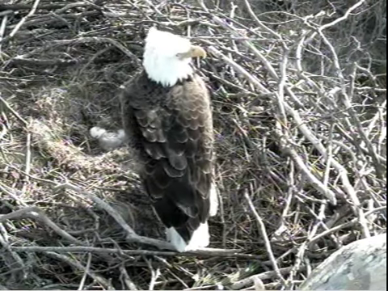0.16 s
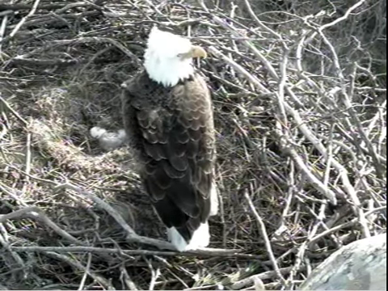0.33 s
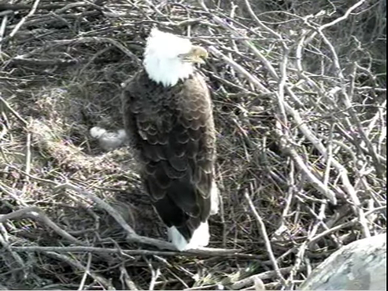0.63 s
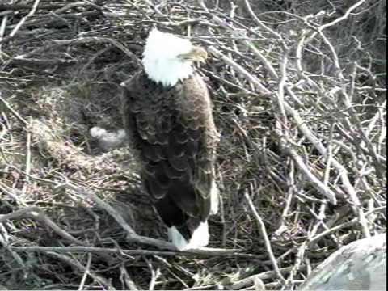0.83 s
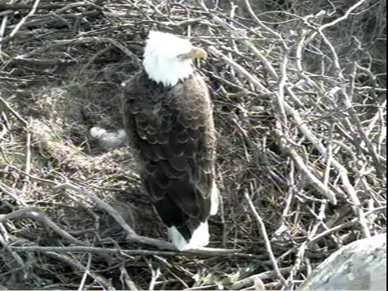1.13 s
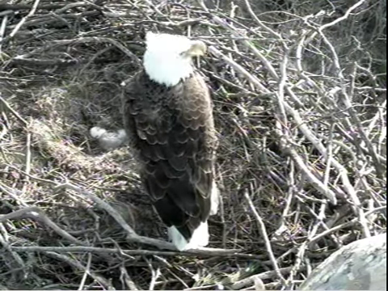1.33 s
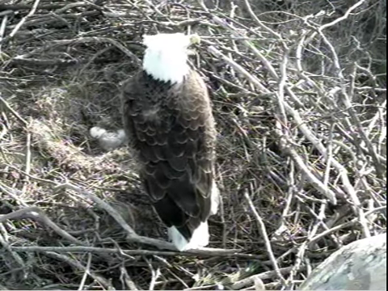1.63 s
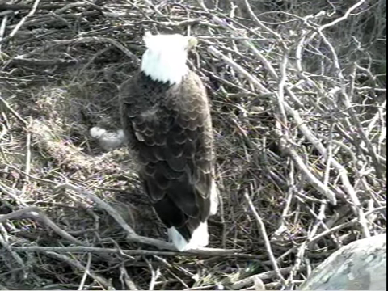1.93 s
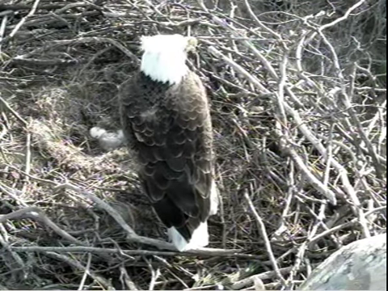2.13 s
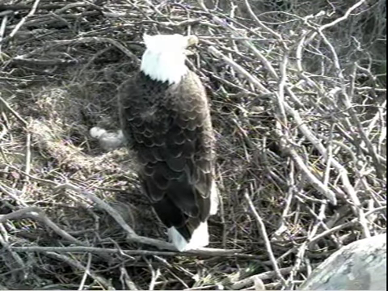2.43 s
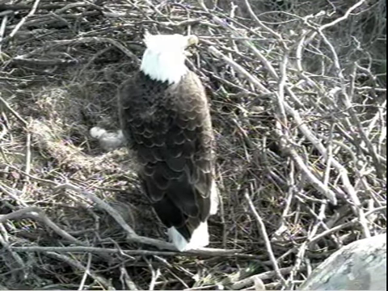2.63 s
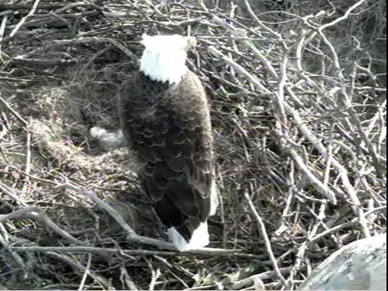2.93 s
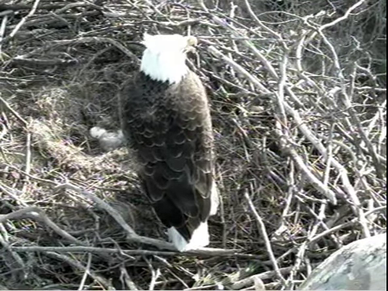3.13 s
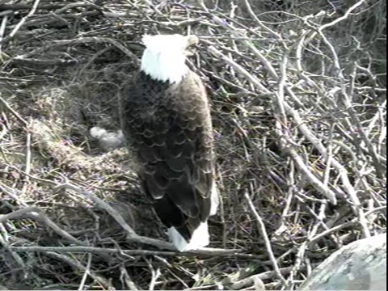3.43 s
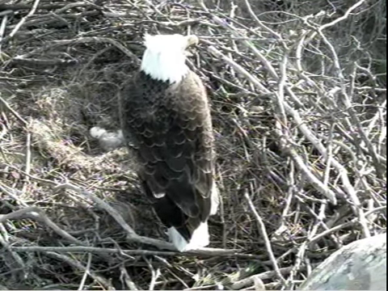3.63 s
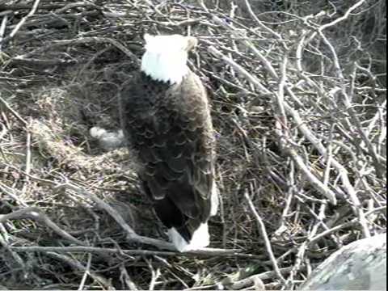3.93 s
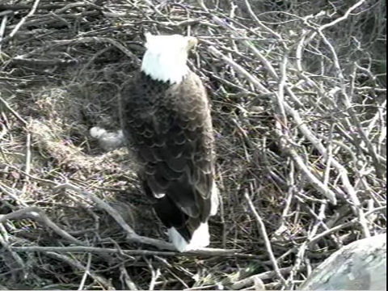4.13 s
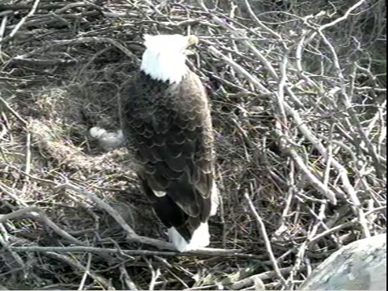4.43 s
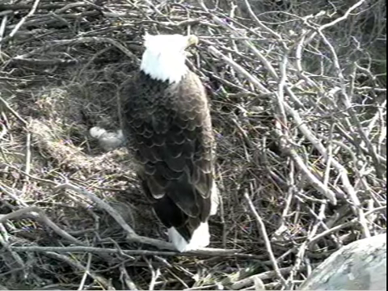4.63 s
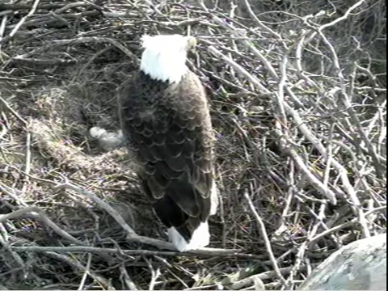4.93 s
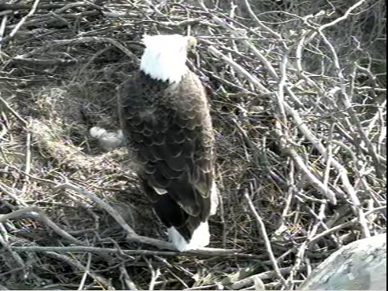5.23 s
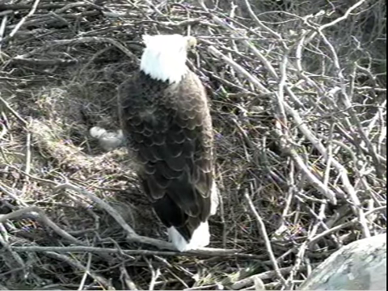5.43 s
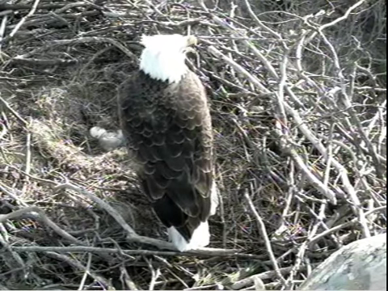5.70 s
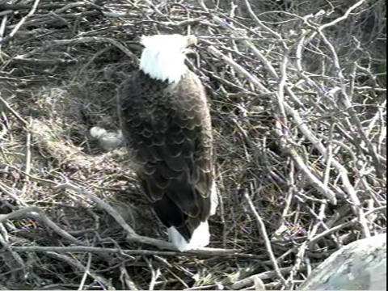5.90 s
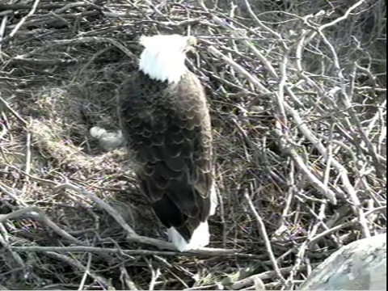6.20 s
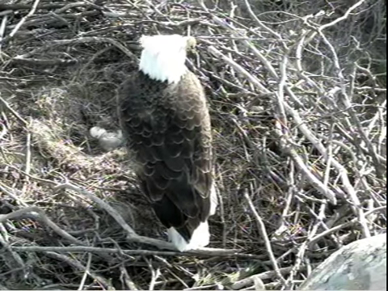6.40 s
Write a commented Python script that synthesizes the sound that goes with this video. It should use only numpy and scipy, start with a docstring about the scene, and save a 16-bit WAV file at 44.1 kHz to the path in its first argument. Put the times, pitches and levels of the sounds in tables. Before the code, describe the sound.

A large bird of prey gives six high whistled calls outdoors over a steady low motor hum, with wind buffeting the microphone at first.

```python
"""At the nest of a bird of prey, one microphone, a small motor droning close by, wind buffeting at first.
The bird whistles six calls with both sides of its voice box, which mix into sum and difference tones;
trunk, ground and branches send a little back. The sound travels on a slow stream that folds high
partials back and drops out once. The player resamples it by repeating its clock's last sample,
which mirrors each whistle."""
import sys
import numpy as np
from scipy import signal
from scipy.fft import rfft, irfft
from scipy.io import wavfile
from scipy.ndimage import uniform_filter1d, minimum_filter1d, map_coordinates

SR = 44100
rng = np.random.default_rng(int(sys.argv[2]) if len(sys.argv) > 2 else 0)


def master(y):
    """Save y as 16-bit WAV."""
    cut = np.clip(np.atleast_2d(y).T, -1, 1)
    pcm = np.round(cut * 32767)  # scale
    wavfile.write(sys.argv[1], SR, pcm.astype(np.int16))


N = 289296
T = np.arange(N) / SR


def amp(db):
    """dB to gain."""
    return 10 ** (np.asarray(db) / 20)


def drift(rate_hz):
    """Random wander of spread 1: noise twice through a one-pole low-pass, run in for a second."""
    pole = np.exp(-2 * np.pi * rate_hz / SR)
    slow = signal.lfilter([1], [1, -2 * pole, pole * pole], rng.standard_normal(N + SR))[SR:]
    return slow / slow.std()


def coloured(spectrum):
    """Noise of rms 1, shaped by rows of f/Hz, relative level/dB."""
    hz, db = np.transpose(spectrum)
    grid = np.fft.rfftfreq(N, 1 / SR) + 1
    shape = amp(np.interp(np.log(grid), np.log(hz), db))
    noise = irfft(rfft(rng.standard_normal(N)) * shape, N)
    return noise / noise.std()


# Shaft speed: t/s, f/Hz
SHAFT_SPEED = [(0, 29.86), (2.3, 29.89), (3.3, 30.13), (4.1, 30.28), (4.95, 30.54), (5.4, 30.62),
               (5.8, 30.56), (6.56, 30.4)]
# Lines of the drone: multiple of shaft speed, level/dB, waver/dB
MOTOR_ORDERS = [(1.034, -56.5, 1.2), (1.973, -57.5, 0.99), (3.057, -65, 2), (3.963, -66.5, 1.5),
                (5.02, -72, 1.5), (6.04, -70, 1.1), (7.84, -55.5, .8), (10.04, -69.5, 0.77),
                (14.04, -72.5, 0.85), (25.03, -62.5, 0.44), (31.47, -73.5, 1.3), (50.3, -75, 1.6),
                (65, -82.5, 1.5), (74.5, -75, 0.88), (92.5, -83.5, 1.4), (99.8, -78.5, 1.8)]
def motor():
    """A small motor near the microphone hums at orders of its shaft speed, each wavering in level."""
    angle = 2 * np.pi * np.cumsum(np.interp(T, *np.transpose(SHAFT_SPEED))) / SR
    starts = rng.uniform(0, 2 * np.pi, len(MOTOR_ORDERS))
    return sum(np.sqrt(2) * amp(db + waver_db * drift(4.1)) * np.sin(order * angle + start)
               for (order, db, waver_db), start in zip(MOTOR_ORDERS, starts))


# Wind strength, as the level of its thudding: t/s, level/dB
GUSTS = [(0, -36), (.02, -41.5), (.12, -42), (.21, -49), (.31, -44.5), (.35, -49.5), (.5, -53), (.57, -60),
         (.63, -47.5), (1.14, -48.5), (1.54, -53.5), (1.9, -59), (2.4, -62), (3.4, -65), (4.3, -58.5),
         (5.2, -70), (6.1, -55.5), (6.56, -64)]
# Spectra of the thudding and the rush: f/Hz, relative level/dB
THUD_SPECTRUM = [(12, -12.5), (40, 4.5), (110, 3), (170, -2.5), (260, -7.5), (500, -34.5)]
RUSH_SPECTRUM = [(60, -20.5), (200, 1.5), (400, -3), (700, -8.5), (1400, -20), (3000, -55)]
def wind(thud_lumps_db=1.5, rush_db=-5, rush_lumps_db=3.0):
    """Wind on the microphone: low thuds and a brighter rush, both in lumps."""
    strength_db = np.interp(T, *np.transpose(GUSTS))
    thuds = amp(strength_db + thud_lumps_db * drift(14)) * coloured(THUD_SPECTRUM)
    rush = amp(strength_db + rush_db + rush_lumps_db * drift(7.2)) * coloured(RUSH_SPECTRUM)
    return thuds + rush


# Background spectrum: f/Hz, relative level/dB
AIR_SPECTRUM = [(12, -4.5), (25, 1), (70, -6.5), (200, -13), (450, -19), (900, -24), (1500, -29.5),
                (2400, -33), (3600, -37.5), (4500, -46)]
def noise_floor(level_db=-51.5):
    """Steady air around the nest and circuit noise."""
    return amp(level_db) * coloured(AIR_SPECTRUM)


# Hiss spectrum: f/Hz, relative level/dB
HISS_SPECTRUM = [(20, 7.5), (3500, 9), (4200, 2), (7500, 7), (9000, 1), (10500, -20)]
def player_hiss(level_db=-82.5):
    """Faint hiss of the player at the far end of the stream."""
    return amp(level_db) * coloured(HISS_SPECTRUM)


# Single eddies: t/s, peak level/dB, length/s
EDDIES = [(0.022, -29.5, 0.0094), (0.071, -35, 0.0096), (0.102, -31.5, 0.0083), (0.39, -30, 0.018),
          (0.789, -45, 0.016), (1.002, -39, 0.023), (1.535, -37.5, 0.035)]
def eddy_thumps():
    """Each eddy gives the microphone's diaphragm one push with a dip on either side."""
    pressure = np.zeros(N)
    for s, db, length_s in EDDIES:
        spread = (np.pi * (T - s) / length_s) ** 2
        pressure += amp(db) * (1 - 2 * spread) * np.exp(-spread)
    return pressure


def membrane(notes, octave_fade_db_per_s, edge_s=.005, join_s=.008, shimmer_db=.8, rasp_db=-31.5):
    """One side of the voice box, a near sine with a rasp of turbulent air: sound, phase, envelope."""
    notes = sorted(notes, key=lambda note: note[1][0][0])
    gate, octave = np.zeros(N), np.zeros(N)
    for octave_db, rows in notes:
        start, end = rows[0][0], rows[-1][0]
        on = np.clip(np.minimum(T - start, end - T) / edge_s + .5, 0, 1)
        gate += on
        age = T[on > 0] - start
        flare_db = 4.5 * np.exp(-age / .026)   # the octave flares as a note starts
        octave[on > 0] = amp(octave_db - octave_fade_db_per_s * age + flare_db)
    # notes closer than join_s run into each other
    join = round(join_s * SR)
    gate = minimum_filter1d(-minimum_filter1d(-gate, size=join), size=join)
    s, hz, db = np.transpose([row for _, rows in notes for row in rows])
    pitch = np.interp(T, s, hz)
    phase = 2 * np.pi * np.cumsum(pitch) / SR
    envelope = np.sqrt(2) * np.minimum(gate, 1) * amp(np.interp(T, s, db) + shimmer_db * drift(52))
    tone = np.sin(phase) + octave * np.sin(2 * phase)
    # the tone sounds rougher the faster its pitch slides
    slide_khz_per_s = np.abs(uniform_filter1d(np.gradient(pitch), SR // 80)) * SR / 1000
    roughness = amp(rasp_db + 1.0839 * np.minimum(slide_khz_per_s, 20)) * drift(600)
    return envelope * (tone + roughness * np.cos(phase)), phase, envelope


# Long whistles, one entry a note: relative octave level/dB, rows of (t/s, f/Hz, level/dB)
LONG_WHISTLES = [ (-8, [(0.716, 1510, -61), (0.724, 1532, -45.5), (0.736, 1600, -47.5), (0.842, 1700, -42),
                 (0.86, 1730, -45.5), (0.874, 1764, -50), (0.882, 1780, -72)]), (-32, [(0.893, 3030, -64),
                 (0.903, 3032, -51.5), (0.945, 3058, -47), (1.005, 3102, -47.5), (1.119, 3145, -36.5),
                 (1.261, 3172, -40), (1.283, 3102, -41), (1.288, 3103, -56)]), (-15, [(1.722, 1750, -48),
                 (1.732, 1786, -38), (1.742, 1897, -36), (1.77, 1971, -35.5), (1.842, 2023, -36.5),
                 (1.928, 2090, -32), (1.944, 2122, -35), (2.04, 2152, -40), (2.114, 2157, -35),
                 (2.238, 2207, -33.5)]), (-29, [(2.697, 2090, -41), (2.705, 2030, -38.5),
                 (2.783, 2091, -38), (2.791, 2103, -35), (2.909, 2159, -37.5), (3.049, 2204, -34.5),
                 (3.071, 2237, -39), (3.091, 2231, -34), (3.147, 2254, -36), (3.16, 2206, -29.5)]),
                 (-31.5, [(3.595, 1812, -53), (3.603, 1850, -37), (3.625, 1980, -36), (3.661, 2025, -36),
                 (3.671, 2085, -44), (3.729, 2104, -37), (3.897, 2227, -37), (3.955, 2207, -35),
                 (4.035, 2252, -36.5), (4.043, 2305, -46), (4.061, 2290, -43), (4.078, 2316, -73)]),
                 (-32, [(4.687, 1889, -52), (4.695, 1884, -35.5), (4.713, 2014, -38.5),
                 (4.723, 2020, -32.5), (4.737, 2080, -42), (4.779, 2136, -38.5), (5.037, 2245, -34.5),
                 (5.085, 2344, -43), (5.108, 2351, -60)]), (-30, [(5.929, 1723, -59), (5.937, 1732, -42.5),
                 (5.963, 1846, -38.5), (5.973, 1894, -43), (6.017, 1990, -40.5), (6.073, 2038, -38.5),
                 (6.177, 2099, -43.5), (6.241, 2118, -39), (6.52, 2190, -38)]), ]
def main_side():
    """The main membrane carries the calls; its octave weakens quickly as a note settles."""
    return membrane(LONG_WHISTLES + list(falls()), octave_fade_db_per_s=15.5)


# Reflections from trunk and ground: delay/s, relative level/dB
REFLECTIONS = [(.023, -23), (.041, -27.5)]
def tree_echoes(call, band_hz=(2040, 3500), scatter_db=-15, scatter_t60_s=.2):
    """Two reflections and the branches' dying scatter, in the band the surroundings return best."""
    t = T[:SR // 2]
    response = rng.standard_normal(len(t)) * amp(-60 * t / scatter_t60_s) * (t > .008)
    response *= amp(scatter_db) / np.sqrt(np.sum(response ** 2))
    for delay_s, db in REFLECTIONS:
        response[round(delay_s * SR)] += amp(db)
    band = signal.butter(2, band_hz, "band", fs=SR, output="sos")
    return signal.fftconvolve(signal.sosfilt(band, call), response)[:N]


# Held notes, one entry a note: relative octave level/dB, rows of (t/s, f/Hz, level/dB)
HELD_NOTES = [ (-30, [(1.06, 2540, -67), (1.13, 2623, -54.5), (1.17, 2699, -42), (1.22, 2745, -43.5),
              (1.274, 2756, -39), (1.284, 2762, -43), (1.292, 2565, -33), (1.31, 2554, -57)]),
              (-31, [(3.7, 1456, -62), (3.732, 1492, -38), (3.782, 1498, -44), (3.828, 1518, -39.5),
              (3.842, 1525, -45), (3.865, 1513, -70)]), (-27, [(3.918, 1548, -53), (3.928, 1546, -39.5),
              (3.958, 1545, -41), (3.98, 1569, -64)]), (-28, [(4.804, 1490, -59), (4.82, 1504, -40.5),
              (4.854, 1512, -46), (4.934, 1525, -42.5), (4.974, 1527, -50), (5.002, 1531, -44.5),
              (5.055, 1533, -62)]), (-29, [(6.0, 1329, -62), (6.042, 1417, -42.5), (6.076, 1426, -39),
              (6.218, 1472, -39), (6.312, 1473, -41.5), (6.358, 1491, -37.5), (6.442, 1517, -35),
              (6.468, 1510, -44.5), (6.485, 1527, -56)]), ]
def second_side():
    """The second membrane adds held notes, catches and high notes at its own pitch."""
    return membrane(HELD_NOTES + list(catches()) + list(high_notes()), octave_fade_db_per_s=3.0)


# How strongly the two sides pull on each other: t/s, gain/dB
SIDE_COUPLING = [(1.15, 7), (1.27, 5), (1.3, 11.5), (2.8, 2), (3.75, 0.1), (3.95, -3), (4.83, 2.5),
                 (4.93, -5), (5.03, 2), (6.05, 3), (6.2, 8.5), (6.42, 2.5), (6.5, 9)]
# Mixing tones: multiple of main, multiple of second, level/dB with both at -40 dB and coupling at 0 dB
MIXING_TONES = [(2, -1, -62), (1, 1, -68.5), (2, -2, -70.5), (-1, 2, -90)]
def voice_box():
    """Both sides sing and, where they overlap, mix into sum and difference tones."""
    main, main_phase, main_envelope = main_side()
    second, second_phase, second_envelope = second_side()
    overlap = main_envelope * second_envelope / (2 * amp(-80))
    coupling = amp(np.interp(T, *np.transpose(SIDE_COUPLING)))
    mixed = sum(np.sqrt(2) * amp(db) * np.sin(m * main_phase + n * second_phase)
                for m, n, db in MIXING_TONES)
    return main + second + overlap * coupling * mixed


# Call endings: t/s, length/s, from f/Hz, to f/Hz, early level/dB, late level/dB, relative octave level/dB
CLOSING_FALLS = [(1.292, 0.024, 2029, 1689, -45, -33.5, -17), (2.24, 0.03275, 2188, 1755, -33.5, -39, -17),
                 (3.165, .039, 2226, 1720, -31, -39, -30), (4.195, .027, 2150, 1818, -38.5, -36.5, -30),
                 (5.188, .028, 2140, 1804, -38.5, -39, -31), (6.522, 0.053, 2213, 1800, -38, -39.5, -30)]
def falls(hold_share=.64, fade_db=12.5, bend=1.3):
    """The main side ends each call with a quickening downward slide that fades over its last part."""
    shares = [0, hold_share / 2, hold_share, 1]
    for s, length, from_hz, to_hz, early_db, late_db, octave_db in CLOSING_FALLS:
        levels = [early_db, (early_db + late_db) / 2, late_db, late_db - fade_db]
        yield octave_db, [(s + k * length, from_hz + k ** bend * (to_hz - from_hz), db)
                          for k, db in zip(shares, levels)]


# Catches in the voice: t/s, length/s, from f/Hz, to f/Hz, peak level/dB
SHORT_CATCHES = [(1.71, 0.029, 1218, 1303, -40), (2.661, 0.037, 1288, 1500, -30),
                 (2.703, 0.012, 1483, 1500, -44), (2.867, 0.036, 1515, 1511, -45),
                 (2.93, 0.036, 1474, 1510, -46.5), (3.001, 0.0298, 1555, 1510, -53.5),
                 (3.584, .023, 1329, 1314, -43.5), (3.613, 0.016, 1430, 1388, -40.5),
                 (3.636, .024, 1453, 1452, -43.5), (3.989, .045, 1547, 1557, -53),
                 (4.673, 0.026, 1368, 1360, -56), (4.705, 0.016, 1450, 1439, -36.5),
                 (6.496, 0.031, 1555, 1592, -48.5), (6.534, .022, 1510, 1450, -50.5)]
def catches(octave_db=-22):
    """The second side sounds for an instant: rise, sagging hold, release."""
    shape = [(0, 20.5), (.3, 0), (.77, 5), (1, 20.5)]   # share of length, drop below peak/dB
    for s, length, from_hz, to_hz, db in SHORT_CATCHES:
        yield octave_db, [(s + k * length, from_hz + k * (to_hz - from_hz), db - drop)
                          for k, drop in shape]


def dropout(off_s=2.018, remnant_end_s=2.05, back_s=2.0675, switch_s=.0005):
    """Gain of the stream: it breaks off, a remnant fades to near silence, it snaps back a bit louder."""
    corners = [(off_s - switch_s, -.5), (off_s + switch_s, -13.5), (remnant_end_s, -27.5),
               (remnant_end_s + .005, -52), (back_s - switch_s, -52), (back_s, 0)]   # t/s, gain/dB
    return amp(np.interp(T, *np.transpose(corners)))


# High notes: t/s, length/s, f/Hz, level/dB, break f/Hz, break level/dB
HIGH_NOTES = [(4.039, .166, 3310, -44, 2700, -39), (5.068, .131, 3333, -44, 2750, -37.5)]
def high_notes(scoop_s=.01764, scoop_hz=119.3, octave_db=-20):
    """The second side jumps to a high note that scoops up, holds and breaks downwards."""
    for s, length, hz, db, break_hz, break_db in HIGH_NOTES:
        end = s + length
        scoop = [(s, hz - scoop_hz, db - 4), (s + scoop_s, hz - scoop_hz / 4, db)]
        hold = [(s + 3 * scoop_s, hz, db), (end - .0341, hz, db)]
        sag_and_break = [(end - .024, hz - 75.3, db + .5), (end - .012, break_hz, break_db)]
        rebound = [(end, break_hz + 100.4, break_db - 9.5)]
        yield octave_db, scoop + hold + sag_and_break + rebound


def steep_low_pass(x, hz):
    """Brick-wall low-pass."""
    return signal.sosfilt(signal.ellip(14, .1, 80, hz, fs=SR, output="sos"), x)


def slow_stream(x, rate_hz=8000, edge_hz=3704):
    """Slow sampling folds what the input filter leaves above half the rate back below it."""
    filtered = signal.sosfilt(signal.butter(12, edge_hz, fs=SR, output="sos"), x)
    mirrored = 2 * filtered * np.cos(2 * np.pi * rate_hz * T)
    return steep_low_pass(filtered + mirrored, rate_hz / 2)


def player_resampling(x, clock_hz=48000):
    """Each sample repeats the player clock's last one: a sawtooth timing error mirrors the whistles."""
    held_s = np.floor(T * clock_hz) / clock_hz
    return map_coordinates(x, [held_s * SR], order=3, mode="nearest")


def scene():
    """Bird, echoes, nearby motor, wind and air at the one microphone by the nest."""
    bird = voice_box()
    return (bird + tree_echoes(bird) + motor() + wind() + eddy_thumps() + noise_floor())[None]


def record(dry):
    """From microphone to listener: slow stream, dropout, hiss, resampling, top cut off."""
    received = slow_stream(dry[0]) * dropout() + player_hiss()
    return steep_low_pass(player_resampling(received), hz=10820)[None]


dry = scene()
out = record(dry)
master(out)
```